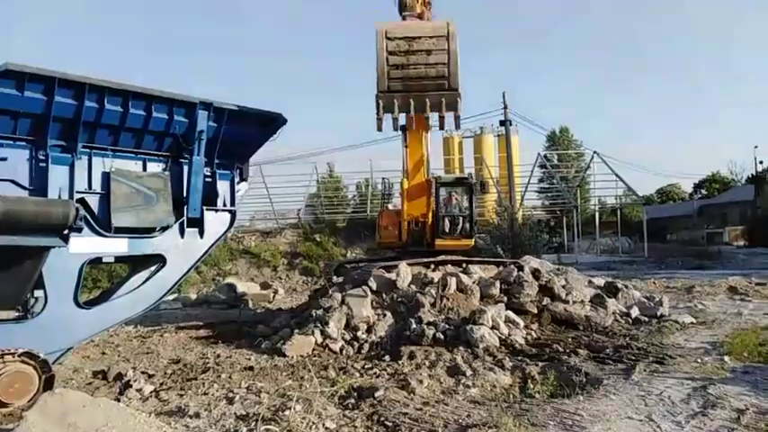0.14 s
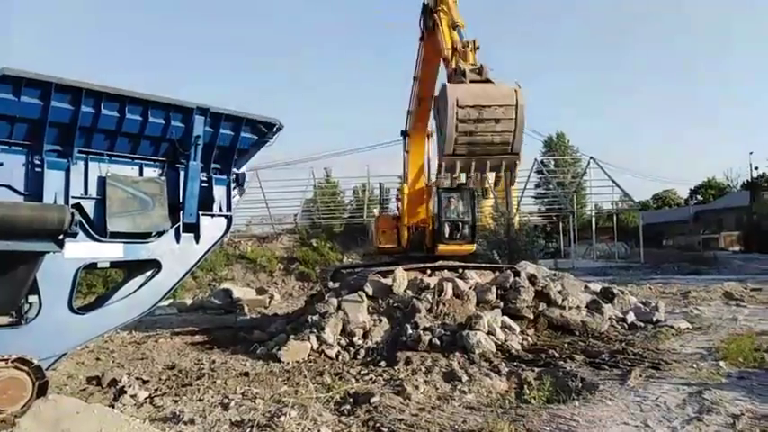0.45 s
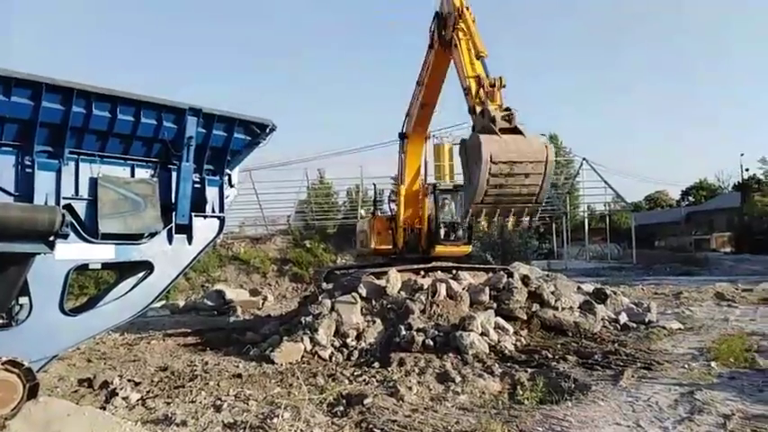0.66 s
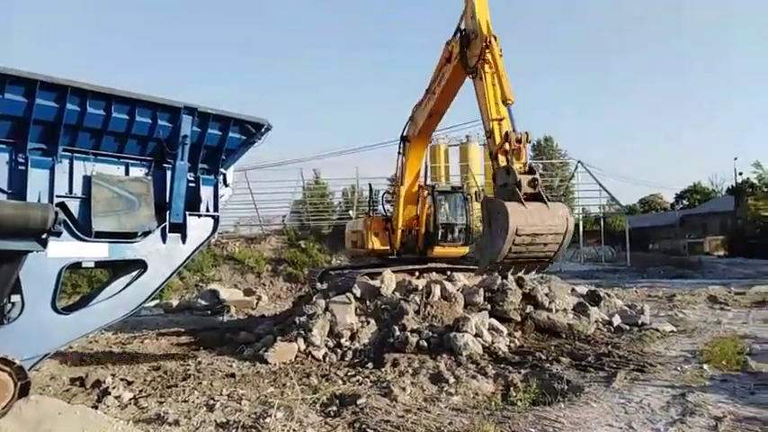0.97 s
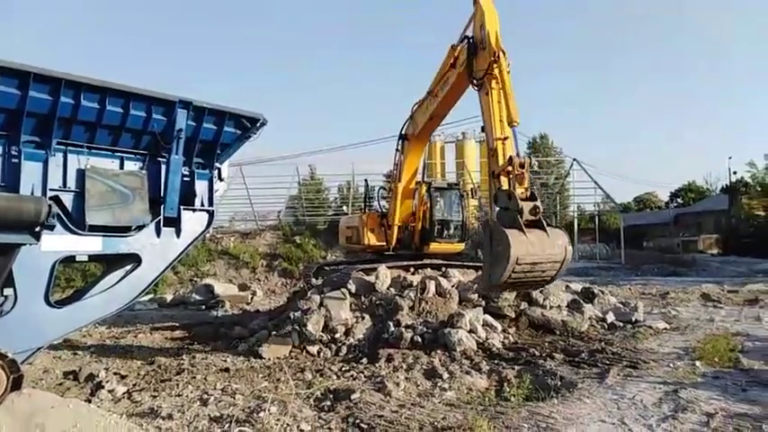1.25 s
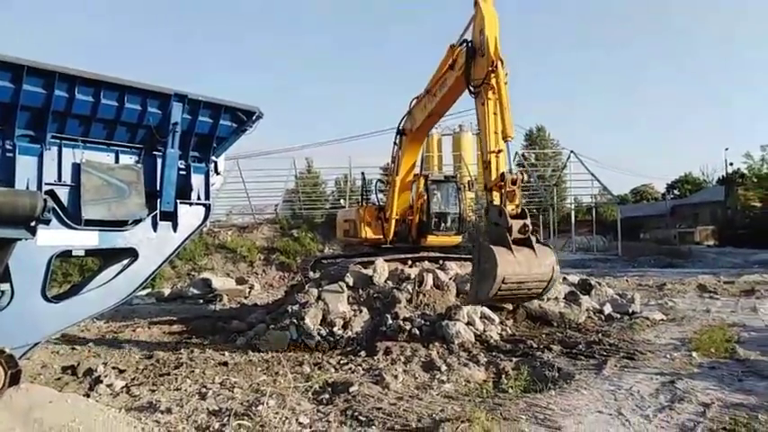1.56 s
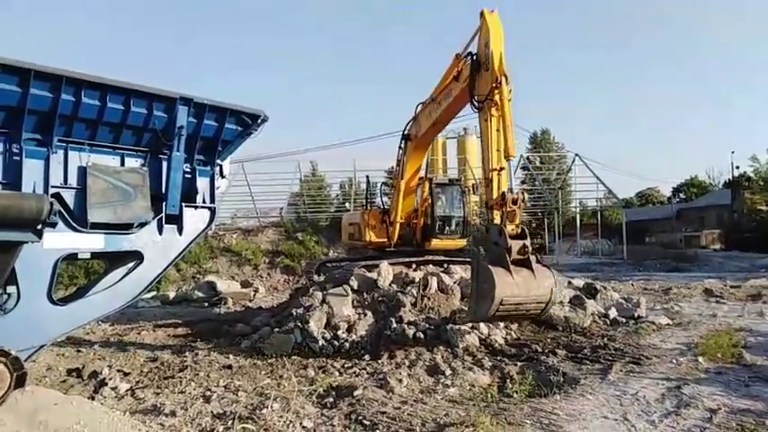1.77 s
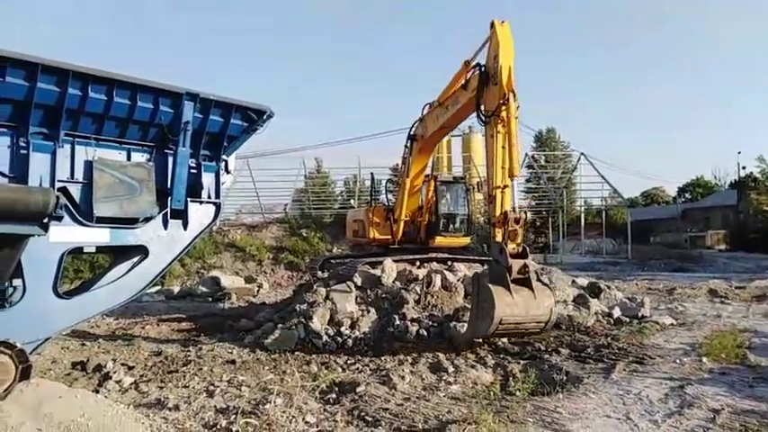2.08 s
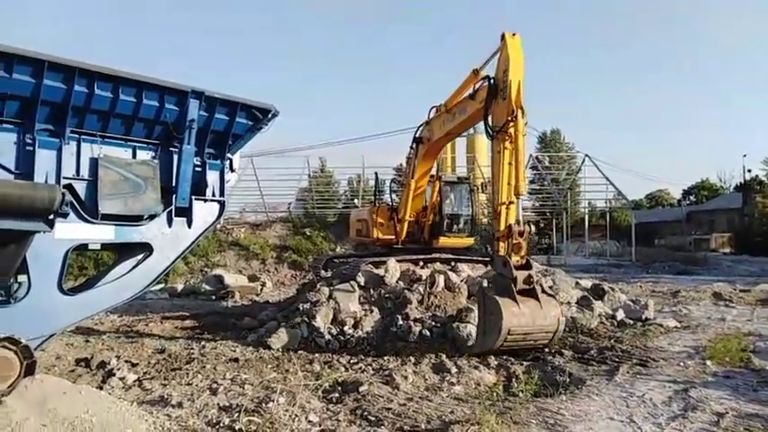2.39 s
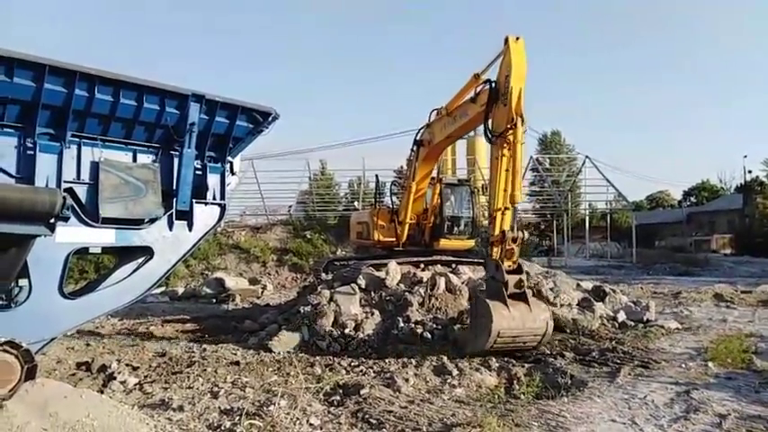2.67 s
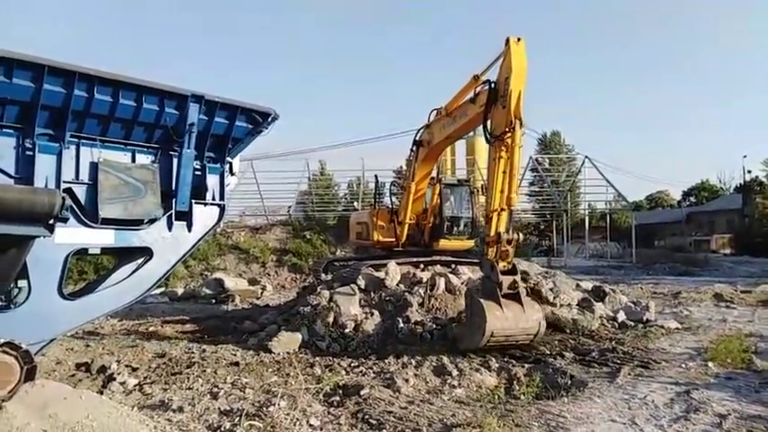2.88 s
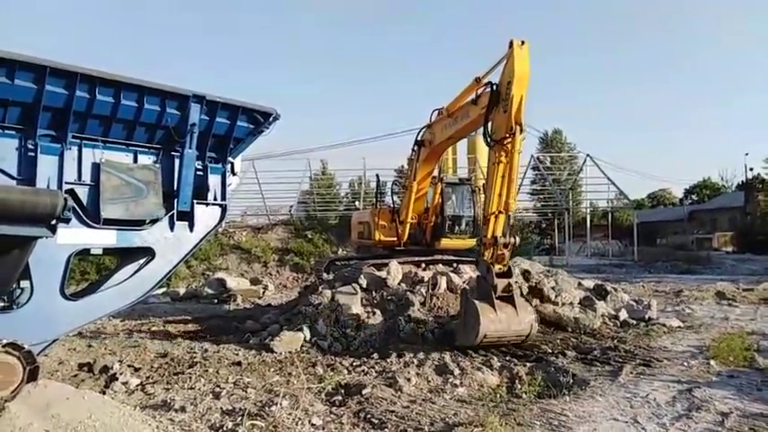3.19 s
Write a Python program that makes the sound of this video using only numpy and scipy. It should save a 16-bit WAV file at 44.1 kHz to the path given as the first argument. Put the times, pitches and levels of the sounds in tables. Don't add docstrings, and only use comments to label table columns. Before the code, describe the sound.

A heavy diesel machinery roar fades in quickly, with low thuds and loose metal rattle; after midway a bucket crunches into concrete, stones ringing and blocks knocking, outdoors on a small stereo camera microphone.

```python
import sys
import numpy as np
from scipy import signal
from scipy.fft import rfft, irfft
from scipy.io import wavfile
from scipy.ndimage import uniform_filter1d

SR = 44100
rng = np.random.default_rng(int(sys.argv[2]) if len(sys.argv) > 2 else 0)


def boost(x):
    u = np.asarray(x, float) / 20
    return 10 ** u


def unload_audio(sound):
    columns = np.transpose(np.atleast_2d(sound))
    steps = np.round(np.clip(columns, -1, 1) * 32767)
    wavfile.write(sys.argv[1], SR, steps.astype(np.int16))


N = 147294

MACHINE_LAG_S, BUCKET_LAG_S = 0.0004143, 0.00003

# time in seconds, roar level in dB, hopper shake in dB.
WORK_LOAD = [(.18, 2, 2), (.3, 1, 4), (.45, 1, 15.5), (.65, -0.5, 10), (.88, 1, -3), (.98, 0, -10),
             (1.1, 0.5, -8), (1.3, 0.5, -3), (1.5, 0, 13), (1.68, 2, -10), (1.78, -1, 0), (1.87, 1, 3),
             (2.0, 0.5, 6), (2.13, 0.5, 16.5), (2.3, 1, 6), (2.7, 0.5, 9), (3.15, 1, -7), (3.3, 1.5, 8)]
# frequency in Hz, left over right in dB.
PORT_LEAN = [(200, 0.5), (600, 0.4), (1500, 4), (2800, -5.5), (4300, 3.5), (7000, -3), (10000, -6),
             (13000, -9)]


def evened(x):
    return x / np.sqrt(np.mean(x ** 2) + 1e-20)


def read(points, hz):
    f, value = np.transpose(points)
    return np.interp(np.log(hz + 1), np.log(f + 1), value)


def drift(top_hz, count=24):
    t = np.arange(0, N + 64, 64) / SR
    f = np.geomspace(top_hz / 20, top_hz, count)[:, None]
    sines = np.sin(2 * np.pi * (f * t + rng.random((count, 1))))
    slow = (sines / np.sqrt(f)).sum(0)
    return np.interp(np.arange(N) / SR, t, evened(slow))


def resonate(x, hz, width):
    r = np.exp(-np.pi * width / SR)
    return signal.lfilter([1 - r, 0, r - 1], [1, -2 * r * np.cos(2 * np.pi * hz / SR), r * r], x)


def clicks(per_s, spread_db):
    chance, sign, size = rng.random((3, N))
    return (chance < per_s / SR) * np.sign(sign - .5) * boost(-spread_db * np.log(size + 0.015))


def lag(hz, lag_s):
    bass_share, turnover_hz = 0.51, 1315
    share = bass_share + (1 - bass_share) * hz ** 2 / (hz ** 2 + turnover_hz ** 2)
    return np.exp(-2j * np.pi * hz * lag_s * share)


def ports(x, lag_s):
    hz = np.fft.rfftfreq(N, 1 / SR)
    lean = boost(read(PORT_LEAN, hz) / 2)
    return irfft(rfft(x) * np.array([lean * lag(hz, lag_s), 1 / lean]), N)


def panned(x, left_over_right_db):
    return x * boost(np.array([[left_over_right_db], [-left_over_right_db]]) / 2)


def blows(table, trim_db, cycles):
    out, t = np.zeros(N + SR), np.arange(SR // 5) / SR
    for (s, db, hz), phase in zip(table, rng.random(len(table))):
        u = t * hz / cycles
        swell = 6 * u * np.exp(-3 * u)
        tone = np.sin(2 * np.pi * (hz * t * (1 - 0.023 * u) + phase))
        out[round(s * SR):][:len(t)] += boost(db + trim_db) * swell * tone
    return out[:N]


def roar():
    # frequency in Hz, level in dB per Hz.
    slope = [(18, -8), (53, -12), (63, -5.5), (100, -1), (220, -6), (828, -14.5), (2200, -23.5),
             (14000, -42.5)]
    # frequency in Hz, width in Hz, dB above the slope.
    casing_humps = [(602, 40, 3), (703, 95, 4), (816, 35, -1), (922, 49, 9), (990, 30, 10), (1874, 980, 5),
                    (2644, 600, -9), (3680, 710, 4), (4355, 670, 4.5), (6900, 190, 4), (9440, 1300, 7),
                    (13850, 200, 3)]
    # frequency in Hz, likeness of the two ports from 0 to 1.
    likeness = [(60, .99), (200, .975), (350, .93), (600, .9), (1000, .72), (2000, .6), (4000, .42),
                (6000, .2), (14000, .1)]
    roar_db, patch_db, swell_db, flicker_db = -13, 0.93, 0.05, 0.97

    hz = np.fft.rfftfreq(4096, 1 / SR)
    a, b, c, d, patches = rng.standard_normal((N // 1024 + 6, 2049, 5)).T
    patches = uniform_filter1d(patches, size=24, axis=0)
    patches = evened(uniform_filter1d(patches, size=3, axis=1))
    humps_db = sum(db / (1 + (2 * (hz - f) / w) ** 2) for f, w, db in casing_humps)
    same = np.clip(read(likeness, hz), 0, 1)[:, None]
    right = a + 1j * b
    left = same * right + np.sqrt(1 - same ** 2) * (c + 1j * d)
    left = left * lag(hz, MACHINE_LAG_S)[:, None]
    lean = boost(read(PORT_LEAN, hz) / 2)[:, None]
    colour = boost((read(slope, hz) + humps_db)[:, None] + patch_db * patches)
    noise = signal.istft(np.array([left * lean, right / lean]) * colour, nperseg=4096, noverlap=3072)[1]
    s, load_db, _ = np.transpose(WORK_LOAD)
    level_db = np.interp(np.arange(N) / SR, s, load_db) + swell_db * drift(11) + flicker_db * drift(40)
    return boost(roar_db + level_db) * evened(noise[:, :N])


def engine():
    # multiple of the cycle rate, level in dB rms.
    orders = [(3.13, -31), (5.4, -30.5), (6.9, -36.5), (7.9, -34), (9.9, -32), (12, -43), (15, -41),
              (16, -33)]
    # time in seconds, firing rate in Hz, level in dB.
    firing_line = [(0.3, 76.93, -27), (0.648, 78.38, -20.5), (1.85, 79.16, -19.5), (1.92, 82.2, -10.5),
                   (1.97, 83.88, -19), (2.38, 77.57, -21), (2.53, 80.1, -19.5), (2.9, 80, -30),
                   (2.98, 83.96, -46), (3.07, 82.47, -16), (3.21, 80.9, -27), (3.34, 82.1, -15)]
    hunt, order_waver_db = 0.00806, 5
    puffs_db, puff_hz, puff_spread_db, puff_jitter_s = -27.5, 239, 5.5, 0.002

    t = np.arange(N) / SR
    s, hz, firing_db = np.transpose(firing_line)
    rate = uniform_filter1d(np.interp(t, s, hz), size=SR // 2) * (1 + hunt * drift(3))
    firings = np.cumsum(rate) / SR
    hum = np.sqrt(2) * boost(np.interp(t, s, firing_db) - 0.5) * np.sin(2 * np.pi * firings)
    for multiple, db in orders:
        level = np.sqrt(2) * boost(db + order_waver_db * drift(5.98))
        hum += level * np.sin(2 * np.pi * (multiple * firings / 4 + rng.random()))

    fired = np.flatnonzero(np.diff(np.floor(firings)))
    late = puff_jitter_s * SR * rng.standard_normal(len(fired))
    fired = np.clip(fired + late.astype(int), 0, N - 1)
    pulses = np.zeros(N)
    pulses[fired] = boost(puff_spread_db * rng.standard_normal(len(fired)))
    puffs = resonate(resonate(pulses, puff_hz, 170), puff_hz, 170)
    return ports(hum + boost(puffs_db) * evened(puffs), MACHINE_LAG_S)


def rattle():
    panels = [(1900, 6.0), (3500, -3.0), (4600, -6.0), (7000, -8.5)]  # Hz, dB
    out = sum(resonate(clicks(460, 3.5), hz, hz * 0.13) * boost(db) for hz, db in panels)
    s, _, shake_db = np.transpose(WORK_LOAD)
    level = boost(-42 + np.interp(np.arange(N) / SR, s, shake_db))
    return ports(level * evened(out), MACHINE_LAG_S)


def jaw_thuds():
    # start in seconds, peak level in dB, pitch in Hz.
    thuds = [(0.358, -13, 159), (0.521, -8, 316), (0.634, -11, 203), (0.722, -9, 263), (0.858, -3, 146),
             (0.9, -3.5, 157), (1.181, -6, 191), (1.409, -9, 196), (1.484, -6, 196), (1.733, -8.5, 177.4),
             (1.871, -6.5, 145), (1.971, -1.5, 195), (2.058, -5.5, 199), (2.193, -2, 202), (2.294, -7, 205),
             (2.414, -8, 148), (2.703, -1.5, 199.6), (2.853, -8, 164), (2.92, -8, 179), (3.191, -7, 157)]
    return ports(blows(thuds, trim_db=-5.5, cycles=6.9), MACHINE_LAG_S)


def higher_jaw_thuds():
    # start in seconds, peak level in dB, pitch in Hz.
    higher_thuds = [(0.521, -12, 316), (0.724, -12, 234), (0.904, -15, 249), (0.959, -14, 227), (1.132, -10, 247),
                    (1.297, -13, 290), (2.202, -9, 221), (2.294, -11, 260), (2.359, -9, 228), (2.628, -12, 256),
                    (2.923, -15, 242), (2.996, -12.5, 288)]
    return ports(blows(higher_thuds, trim_db=-6, cycles=9), MACHINE_LAG_S)


def squeaks():
    # start in seconds, peak level in dB, second partial in Hz, first partial in relative dB.
    chirps = [(.764, -30, 6920, 4), (1.009, -29, 6910, 5), (2.538, -33, 6900, -3), (2.596, -27, 6900, -4),
              (2.794, -26, 6910, 0), (2.853, -25, 6950, 1), (3.235, -28, 7020, 0), (3.303, -29, 6980, 2)]
    # start in seconds, length in seconds, level in dB, pitch in Hz.
    squeals = [(.735, .022, -29, 3680), (1.03, .03, -30, 3480), (1.228, .022, -29, 4520),
               (2.79, .032, -27, 3480), (2.845, .012, -22, 3650), (2.858, .016, -21, 3520),
               (2.874, .02, -23, 3560), (2.899, .012, -21, 4280), (3.1, .018, -31, 5000),
               (3.265, .04, -28, 3750), (3.298, .04, -27, 3560)]
    chirp_s, low_late_s, low_longer, third_db = .022, .006, 1.5, -15
    sag, squeal_waver, squeal_fall = .03, .028, .04

    out, t = np.zeros(N + SR), np.arange(round(.07 * SR)) / SR

    def bell(start, length):
        return np.sin(np.pi * np.clip((t - start) / length, 0, 1)) ** 2

    for s, db, hz, low_db in chirps:
        turn = np.pi * hz * np.cumsum(1 + sag * np.exp(-t / 0.0056)) / SR
        upper = (np.sin(2 * turn) + boost(third_db) * np.sin(3 * turn)) * bell(0, chirp_s)
        lower = boost(low_db) * np.sin(turn * 1.01) * bell(low_late_s, chirp_s * low_longer)
        out[round((s - .006) * SR):][:len(t)] += boost(db) * (upper + lower)

    waver = np.pad(drift(120), (0, SR))
    for s, length, db, hz in squeals:
        at = round(s * SR)
        bend = 1 + squeal_waver * waver[at:][:len(t)] + squeal_fall * (.5 - t / length)
        tone = np.sin(2 * np.pi * hz * np.cumsum(bend) / SR)
        out[at:][:len(t)] += boost(db) * tone * np.sqrt(bell(0, length))

    rough = 1 + .55 * evened(uniform_filter1d(rng.standard_normal((2, N)), size=50))
    return panned(out[:N] * rough, -7)


def whistle():
    # time in seconds, pitch in Hz, level in dB.
    turbo_line = [(1.45, 9240, -55), (1.51, 9250, -46), (1.6, 9270, -54), (1.7, 9240, -46),
                  (1.86, 9257, -39), (1.935, 9265, -41), (1.955, 9260, -30), (2.05, 9268, -29),
                  (2.15, 9300, -36), (2.38, 9348, -35), (2.62, 9370, -37), (2.95, 9342, -38),
                  (3.14, 9305, -39), (3.18, 9280, -31.5), (3.34, 9262, -33)]
    waver_hz, flutter_db, trim_db, breath_db = 8, 1.8, -1, -9

    t = np.arange(N) / SR
    s, hz, db = np.transpose(turbo_line)
    phase = 2 * np.pi * np.cumsum(np.interp(t, s, hz) + waver_hz * drift(200)) / SR
    breath = boost(breath_db) * evened(uniform_filter1d(rng.standard_normal((2, N)), size=150))
    level = boost(np.interp(t, s, db, left=-80) + trim_db + flutter_db * drift(150))
    tone = (1 + breath[0]) * np.sin(phase) + breath[1] * np.cos(phase)
    return panned(np.sqrt(2) * level * tone, -5)


def bucket():
    # start in seconds, peak level in dB, rise in seconds, T60 in seconds, loudest plate in Hz.
    crunches = [(2.46, -15, .02, 0.24, 1600), (2.61, -3, 0.0085, 0.23, 1970),
                (2.648, -19, 0.008, 0.16, 1250), (2.68, -19.5, 0.01, 0.59, 3800),
                (2.814, -5.5, 0.004, 0.12, 2602), (2.85, -8, 0.023, 0.29, 1720),
                (2.876, -10.5, 0.0073, 0.15, 1290), (2.902, -8.5, .004, 0.17, 1390),
                (2.919, -8, .005, 0.14, 1730), (2.956, -1, 0.011, 0.15, 2080),
                (2.975, -9.5, .006, .2, 1150), (3.0, -9.5, 0.01, 0.18, 2100),
                (3.037, -15, 0.0055, 0.1, 2000), (3.092, -8.5, 0.0068, 0.13, 1950),
                (3.109, -13, .006, 0.18, 2220), (3.145, -23, .01, .2, 2300),
                (3.168, -17.5, 0.0066, 0.22, 2000), (3.232, -5.5, 0.0079, 0.094, 2400),
                (3.242, -6, 0.006, 0.1, 2390), (3.325, -15, 0.01, 0.16, 3023)]
    # frequency in Hz, level in dB per Hz.
    grit = [(240, -26), (550, -10), (1150, 2.5), (2020, -1.5), (2700, -6), (3620, -7), (5200, -9.5),
            (14000, -23)]
    # frequency in Hz, width in Hz, level in dB.
    plates = [(1150, 89, 12.5), (1600, 140, 11), (2000, 71, 2.5), (2400, 110, 3), (2660, 80, 3),
              (3280, 51, -8), (3760, 67, 1), (4750, 110, 6), (5120, 68, -15)]
    crunch_trim_db, clump_db, ring_db, loudest_db, loudest_width_hz = -7.5, 2, -7, -2, 450
    plate_shift, plate_spread_db = .04, 2
    yard_t60_s, yard_db = 0.22, -11

    t, dry = np.arange(SR // 2) / SR, np.zeros(N + SR)
    grains = evened(clicks(9000, 0.5)) * boost(clump_db * drift(340))
    colour = boost(read(grit, np.fft.rfftfreq(len(t), 1 / SR)))
    draws = rng.standard_normal((len(crunches), 2, len(plates)))
    for (s, db, rise_s, t60, plate_hz), draw in zip(crunches, draws):
        at = round((s - rise_s / 2) * SR)
        envelope = np.minimum(t / max(rise_s, .001), 1) * boost(-60 * t / max(t60, .03))
        push = np.roll(grains, -at)[:len(t)] * envelope
        ring = sum(boost(g + plate_spread_db * a) * resonate(push, hz * (1 + plate_shift * b), w)
                   for (hz, w, g), a, b in zip(plates, *draw))
        sound = evened(irfft(rfft(push) * colour, len(t))) + boost(ring_db) * evened(ring)
        sound += boost(loudest_db) * evened(resonate(push, plate_hz, loudest_width_hz))
        dry[at:at + len(t)] += boost(db + crunch_trim_db) * np.std(push) * evened(sound)

    tail = rng.standard_normal((2, len(t))) * boost(-60 * t / yard_t60_s)
    tail /= np.linalg.norm(tail[0])
    wet = signal.fftconvolve(ports(dry[:N], .005), tail, axes=1)[:, :N]
    return ports(dry[:N], BUCKET_LAG_S) + boost(yard_db) * wet


def stone_pings():
    # start in seconds, peak level in dB, pitch in Hz.
    pings = [(2.606, -12, 2000), (2.615, -14, 2700), (2.638, -10, 1500), (2.814, -16, 2700),
             (2.855, -10, 1700), (2.88, -9, 1290), (2.918, -14, 1660), (2.956, -12, 2100),
             (2.972, -13, 1150), (2.976, -14, 3540), (3.108, -15, 2256), (3.24, -15, 2400)]
    return ports(blows(pings, trim_db=-5.5, cycles=29), BUCKET_LAG_S)


def block_knocks():
    # start in seconds, peak level in dB, pitch in Hz.
    knocks = [(2.656, -11, 920), (2.744, -8, 990), (3.022, -6.5, 520.5), (3.039, -13, 574),
              (3.065, -4.5, 588), (3.109, -9, 431), (3.189, -8, 566), (3.282, -4, 508), (3.324, -3.5, 616)]
    return ports(blows(knocks, trim_db=-5.5, cycles=12.2), BUCKET_LAG_S)


def scene():
    crusher = roar() + engine() + rattle() + jaw_thuds() + higher_jaw_thuds()
    excavator = squeaks() + whistle() + bucket() + stone_pings() + block_knocks()
    return crusher + excavator


def band_limit(x):
    return signal.sosfilt(signal.butter(12, 14220, fs=SR, output="sos"), x)


def record(dry):
    # frequency in Hz, depth as an exponent.
    gate_depth = [(1000, 0), (2500, .2), (5000, .45), (7000, .4), (10000, 1.1)]
    mute_s, fade_from_s, fade_to_s, limit, low_cut_hz = .077, 0.065, 0.41, 0.81, 58

    t = np.arange(N) / SR
    fade = np.clip((t - fade_from_s) / (fade_to_s - fade_from_s), 0, 1)
    cut = signal.sosfilt(signal.butter(4, low_cut_hz, "high", fs=SR, output="sos"), dry)
    limited = limit * np.tanh(cut * fade / limit)
    hz, _, z = signal.stft(limited, SR, nperseg=2048)
    power = abs(z) ** 2
    local = uniform_filter1d(power, size=17, axis=1) + 1e-20
    z *= np.minimum(power / local, 1) ** np.maximum(read(gate_depth, hz), 0)[:, None]
    mix = signal.istft(z, SR, nperseg=2048)[1][:, :N] * (t > mute_s)
    return band_limit(mix)


dry = scene()
out = record(dry)
unload_audio(out)
```